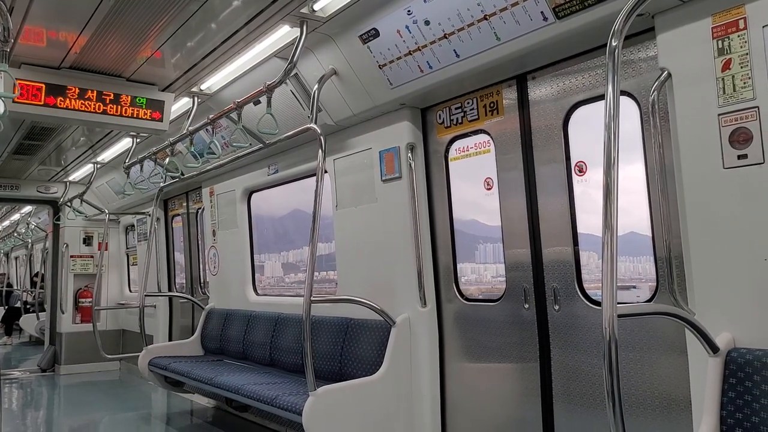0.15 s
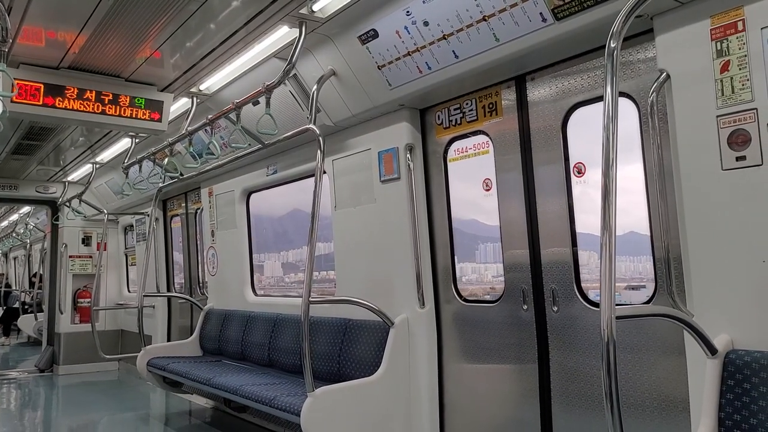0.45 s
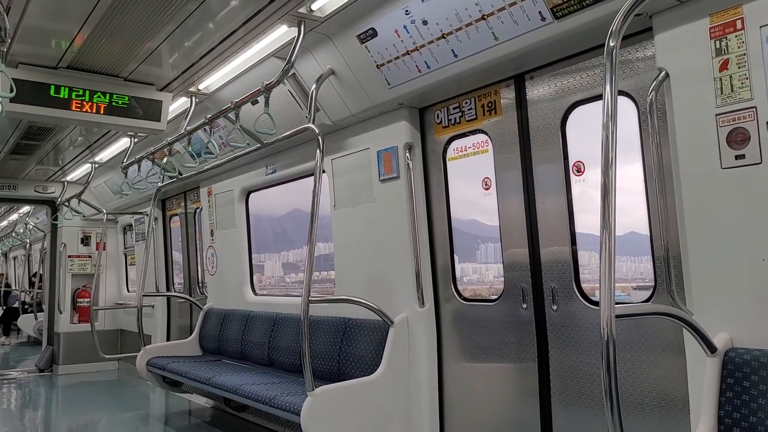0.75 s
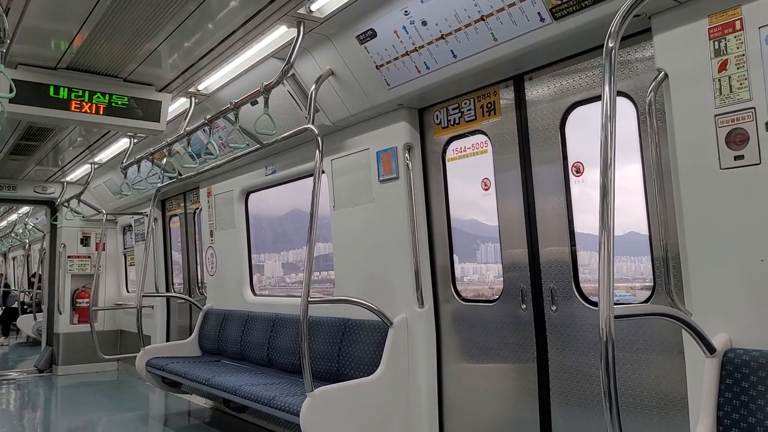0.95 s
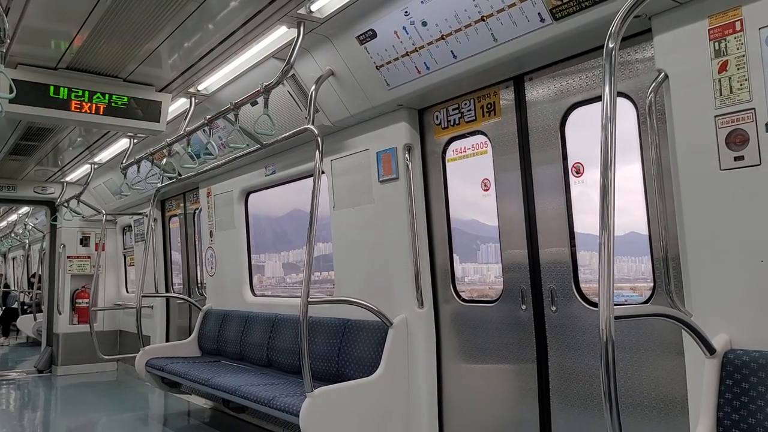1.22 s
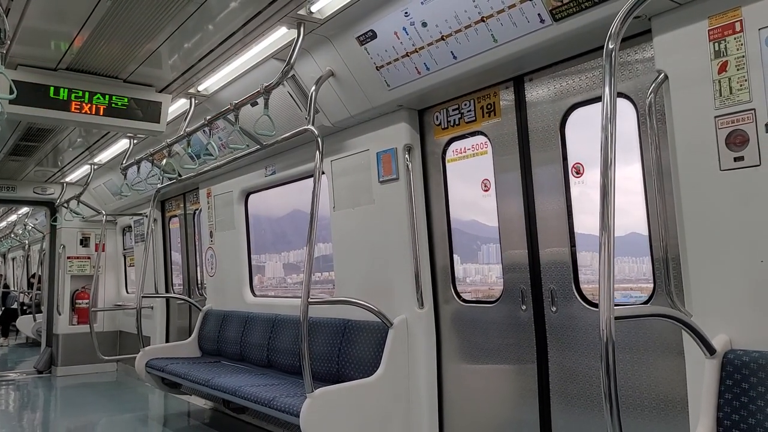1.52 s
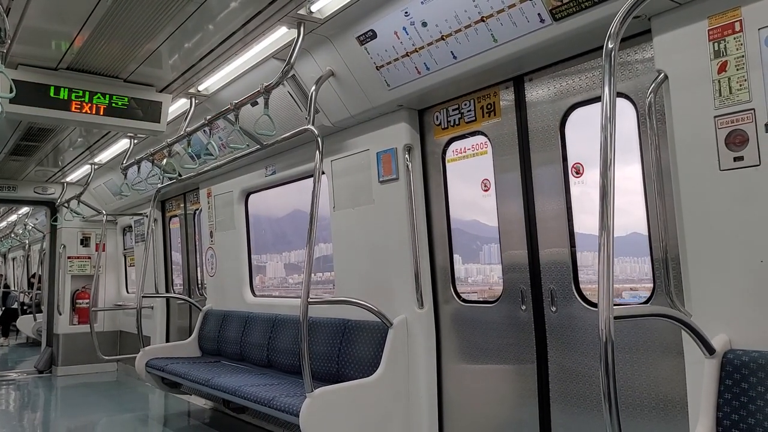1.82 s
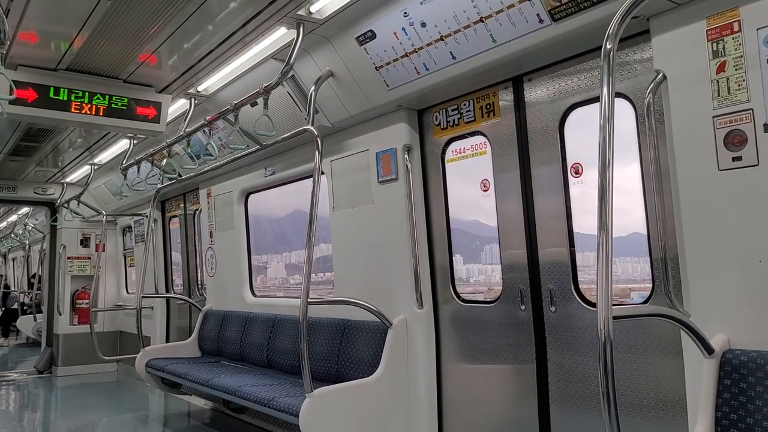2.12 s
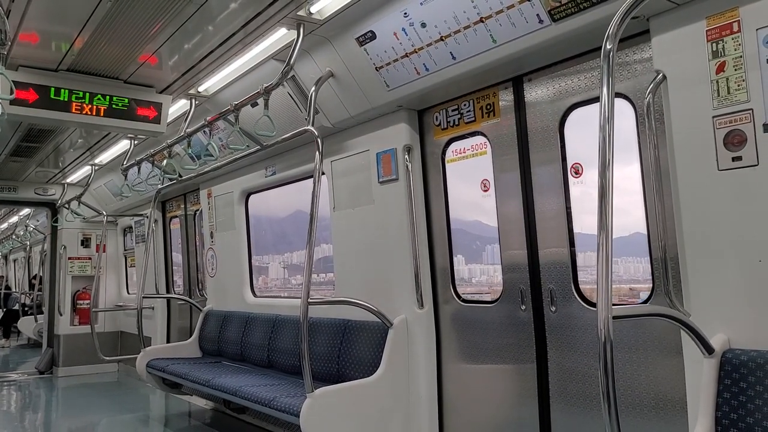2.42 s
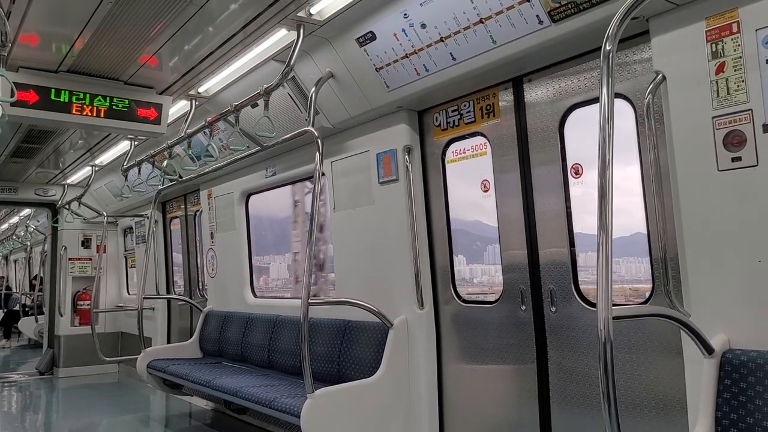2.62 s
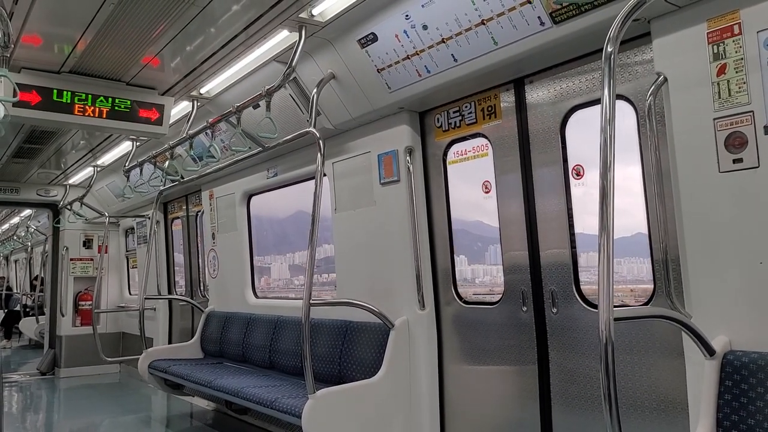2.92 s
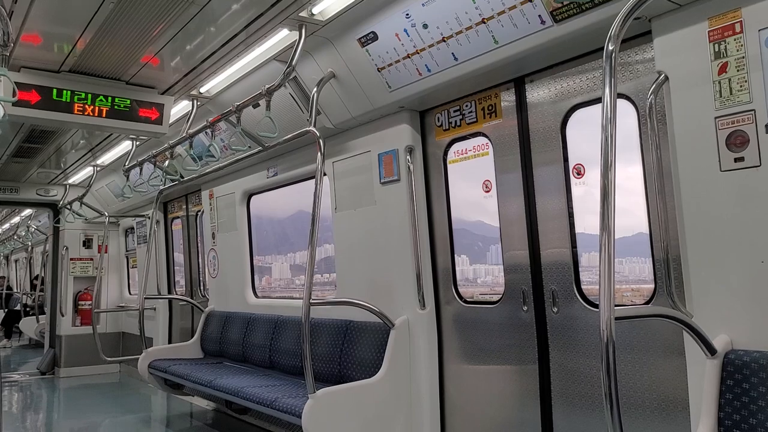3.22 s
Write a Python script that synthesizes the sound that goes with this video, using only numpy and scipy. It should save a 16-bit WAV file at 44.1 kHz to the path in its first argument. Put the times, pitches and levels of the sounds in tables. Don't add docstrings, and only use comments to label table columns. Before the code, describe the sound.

Metro train rumbles steadily inside an empty car: broad boomy wheel roar, irregular low thumps, dull axle knocks and light panel rattles, over ventilation air and faint electrical hum, picked up by a stereo microphone inside.

```python
import sys
import numpy as np
from scipy import signal
from scipy.fft import rfft, irfft, next_fast_len
from scipy.io import wavfile
from scipy.ndimage import uniform_filter1d

SR = 44100
rng = np.random.default_rng(int(sys.argv[2]) if len(sys.argv) > 2 else 0)


def volts_from_decibels(level):
    exponent = np.asarray(level, float) / 20
    return 10 ** exponent


def wav_out(sig):
    wavfile.write(sys.argv[1], SR, np.round(np.clip(np.atleast_2d(sig).T, -1, 1) * 32767).astype(np.int16))


N = 147735
LENGTH = next_fast_len(N)
HZ = np.maximum(np.arange(LENGTH // 2 + 1) * SR / LENGTH, 1)
TIME = np.arange(N) / SR


def curve(table, hz):
    table = np.array(table, float)
    return np.interp(np.log(hz), np.log(table[:, 0]), table[:, 1])


def band(lo_hz, hi_hz):
    return 1 / np.sqrt((1 + (lo_hz / HZ) ** 6) * (1 + (HZ / hi_hz) ** 12))


def resonances(modes):
    power = 0
    for hz, width_hz, db in modes:
        detune = (HZ / hz - hz / HZ) * hz / width_hz
        power = power + volts_from_decibels(db) ** 2 / (1 + detune ** 2) ** 2
    return np.sqrt(power) * band(15, 6500)


def walk(rate_hz):
    hold = int(SR / rate_hz)
    steps = np.repeat(rng.standard_normal(N // hold + 1), hold)
    return 1.3 * uniform_filter1d(uniform_filter1d(steps, hold), hold)[:N]


def swell(start_s, length_s):
    age = np.maximum(TIME - start_s, 0)
    return (1 - np.exp(-age / 0.0099)) / (1 + (age / length_s) ** 4)


def ports_apart(db):
    return volts_from_decibels(np.array([[db], [-db]]))


def diffuse_noise(gain, flicker_db, rate_hz, octaves):
    # (frequency [Hz], likeness [-1..1])
    port_likeness = [(40, .995), (120, 0.95), (190, 0.84), (330, 0.68), (460, -0.27), (700, -0.12),
                     (1000, -0.48), (1550, -0.53), (2200, 0.15), (2900, -0.24), (3800, -0.066)]
    # (frequency [Hz], left minus right [dB])
    port_tilt = [(40, 0.5), (130, 4.5), (240, -0.6), (370, 5), (600, 1), (1900, 1), (2300, 4), (3900, 6.5),
                 (5000, 3), (7500, 3.5), (9300, -6.5), (11500, -3), (15500, -2)]
    like = np.clip(curve(port_likeness, HZ), -.998, .998)
    noise = rfft(rng.standard_normal((2, LENGTH)))
    mid, side = noise * gain * np.sqrt([1 + like, 1 - like])
    ports = np.array([mid + side, mid - side])
    ports = ports * volts_from_decibels(np.outer([.5, -.5], curve(port_tilt, HZ)))
    place = np.clip(np.log2(HZ), octaves[0], octaves[-1])
    out = 0
    for centre in octaves:
        share = np.maximum(1 - np.abs(place - centre), 0)
        out = out + irfft(ports * share, LENGTH)[:, :N] * volts_from_decibels(flicker_db * walk(rate_hz))
    return out / np.sqrt(np.mean(out ** 2))


def blows(hits, rise_cycles, fall_cycles, trim_db, sag):
    out = np.zeros(N)
    for (felt_s, db, hz), turn in zip(hits, rng.random(len(hits))):
        start_s = felt_s - 0.00894
        span = slice(int(start_s * SR), int((start_s + 9 * fall_cycles / hz) * SR))
        cycles = (TIME[span] - start_s) * hz
        shape = (1 - np.exp(-(cycles / rise_cycles) ** 2)) * np.exp(-cycles / fall_cycles)
        phase = cycles * (1 + sag * np.exp(-cycles / 2)) + turn
        out[span] += volts_from_decibels(db + trim_db) * shape / shape.max() * np.sin(2 * np.pi * phase)
    return out * ports_apart(1.2)


def rail_roughness():
    # (time [s], roughness level [dB])
    rail = np.array([(0, -29), (.1, -29), (.22, -29), (.36, -26.5), (.47, -28.5), (.6, -31.5), (.78, -32),
                     (.85, -30), (1.3, -29.5), (1.42, -31), (1.68, -33), (1.8, -30), (2.08, -30.5),
                     (2.2, -29), (2.64, -32), (2.72, -30), (3.18, -28), (3.35, -30)], float)
    rough_db = np.interp(TIME, rail[:, 0], rail[:, 1])
    return rough_db - rough_db.mean()


def mains_hum():
    mains_hz = 119.94
    # (multiple of mains_hz [1], rms in step [dB], rms opposed [dB])
    partials = [(7, -62.0, -60.0), (8, -61.0, -64.0), (9, -65.0, -52.0), (10, -63.0, -58.0),
                (13, -66.0, -62.0), (14, -58.0, -56.0), (15, -64.0, -71.0), (16, -61.0, -62.0),
                (23, -72.0, -77.0), (27, -81.0, -83.0), (29, -78.0, -84.0), (30, -77.0, -79.0),
                (31, -74.0, -79.0)]
    out = 0
    for order, mid_db, side_db in partials:
        turn = rng.random((2, 1))
        level_db = np.array([[mid_db], [side_db]]) + 2.2 * walk(4.44)
        mid, side = np.sin(2 * np.pi * (order * mains_hz * TIME + turn)) * volts_from_decibels(level_db)
        out = out + np.sqrt(2) * np.array([mid + side, mid - side])
    return out


def ventilation(rough_db):
    # (frequency [Hz], density [dB per Hz])
    air_spectrum = [(900, -16.5), (1200, -22.5), (1600, -20.5), (2250, -23.5), (2550, -33.5), (3500, -33),
                    (4000, -34), (4550, -31.5)]
    gain = volts_from_decibels(curve(air_spectrum, HZ)) * band(710, 4270) ** 2
    return volts_from_decibels(-42 + 0.061 * rough_db) * diffuse_noise(gain, 0.93, 6.1, octaves=[10, 11, 12])


def hiss(rough_db):
    # (frequency [Hz], density [dB per Hz])
    hiss_spectrum = [(3000, -7), (5200, 5.5), (7000, 1.5), (8800, -1.5), (9900, -1), (12000, 0), (15500, 1)]
    gain = volts_from_decibels(curve(hiss_spectrum, HZ)) * band(2100, 18100)
    level_db = -58.5 + 0.17 * rough_db + 1.2 * walk(6.5)
    return volts_from_decibels(level_db) * diffuse_noise(gain, 0.26, 6.9, octaves=[12, 13, 14])


def creaks():
    # (time [s], level [dB], pitch [Hz], width [Hz], length [s])
    creak_events = [(0, -63, 11000, 8000, .03), (.1, -67, 10500, 5000, .33), (.14, -39, 220, 40, .15),
                    (.33, -38, 1100, 1000, .05), (.33, -65, 5950, 900, .09), (.6, -51, 2200, 900, .2),
                    (.71, -65, 7000, 900, .04), (1.167, -47, 750, 395, .03), (1.7, -41, 190, 50, .14),
                    (1.775, -46, 1130, 200, .05), (1.86, -55, 2690, 90, .05), (2.18, -61, 3720, 30, .2),
                    (2.3, -43, 200, 50, .12), (2.74, -62, 3720, 30, .12), (2.87, -56, 2880, 40, .08),
                    (2.88, -42, 225, 40, .07), (3.04, -52, 2880, 80, .05), (3.05, -47, 1080, 70, .06),
                    (3.06, -46, 2250, 300, .05), (3.12, -57, 3720, 30, .1), (3.13, -37, 560, 160, .15),
                    (3.14, -54, 2910, 30, .12), (3.16, -54, 2430, 80, .06), (3.335, -62, 11000, 8000, .03)]
    noise = rfft(rng.standard_normal((2, LENGTH)))
    out = 0
    for start_s, db, hz, width_hz, length_s in creak_events:
        detune = (HZ / hz - hz / HZ) * hz / width_hz
        ring = irfft(noise / (1 + detune ** 2), LENGTH)[:, :N]
        out = out + volts_from_decibels(db) * swell(start_s, length_s) * ring / ring.std()
    return out


def panel_rattles():
    # (time [s], peak [dB], pitch [Hz])
    rattle_hits = [(0.103, -25, 738), (0.191, -25, 690), (0.274, -29, 732), (0.332, -23, 724),
                   (0.456, -22, 660), (0.846, -22.5, 491), (1.174, -26, 683), (1.208, -25, 520),
                   (1.278, -22, 670), (1.333, -23, 610), (1.41, -32, 720), (1.449, -28, 680),
                   (1.72, -35, 680), (1.788, -26, 727), (1.875, -25, 665), (2.001, -23.5, 497),
                   (2.141, -23, 473), (2.206, -25, 673), (2.804, -30, 715), (2.856, -28, 675),
                   (2.914, -20, 653), (3.038, -28, 687), (3.139, -19.5, 678), (3.206, -22.5, 627)]
    return blows(rattle_hits, rise_cycles=2.8, fall_cycles=8.4, trim_db=-6, sag=.01)


def floor_rings():
    # (time [s], level [dB], length [s])
    shakes = [
        (.1, -43, .27),
        (.31, -38, .086),
        (.464, -37, .09),
        (1.075, -40, .14),
        (1.2, -33, .17),
        (1.6, -37, .08),
        (1.66, -33, .18),
        (2.14, -34, .17),
        (2.684, -33, .22),
        (3.14, -35, .12),
    ]
    # (frequency [Hz], width [Hz], level [dB])
    panel_modes = [(342.6, 38, -10), (376, 39, -13), (670, 63, -14.5)]
    sing_hz = 346 * (1 + .014 * walk(25))
    sing = np.sin(2 * np.pi * np.cumsum(sing_hz) / SR) * volts_from_decibels(1.3 * walk(20)) * ports_apart(2.5)
    shaking = volts_from_decibels(-2.5) * diffuse_noise(resonances(panel_modes), 0.32, 14, octaves=[9])
    envelope = sum(volts_from_decibels(db) * swell(start_s, length_s) for start_s, db, length_s in shakes)
    return envelope * (shaking + sing)


def axle_knocks():
    # (time [s], peak [dB], pitch [Hz])
    knock_hits = [(0.121, -13, 280), (0.189, -21.5, 381), (0.367, -17.5, 348), (0.479, -14, 341),
                  (1.281, -15, 368), (1.687, -26, 335), (1.772, -19, 382), (2.156, -17.5, 403),
                  (2.226, -27, 344), (2.699, -16, 377), (2.834, -18, 355), (3.149, -16, 300),
                  (3.191, -12, 353), (3.244, -13.5, 310)]
    return blows(knock_hits, rise_cycles=2.15, fall_cycles=4.5, trim_db=-9, sag=0.015)


def track_thumps():
    # (time [s], peak [dB], pitch [Hz])
    thump_hits = [(.04, -13.5, 50.3), (.134, -11, 95), (.158, -10.5, 67), (.245, -12, 63),
                  (.295, -12.5, 52), (.328, -15.5, 51.4), (.385, -18, 85), (.44, -14, 72),
                  (.478, -11, 43.8), (.51, -12.5, 42), (.635, -19, 44), (.725, -17, 80), (.785, -17, 77),
                  (.855, -21.5, 68.6), (.92, -20, 45), (.985, -23, 56), (1.038, -18, 56), (1.115, -21, 46),
                  (1.185, -14, 70), (1.255, -15, 63), (1.305, -16, 80), (1.38, -13, 93), (1.497, -24, 52),
                  (1.565, -21, 55), (1.885, -12.5, 43), (1.96, -16, 52.4), (1.99, -16, 96), (2.01, -16, 44),
                  (2.21, -15.5, 49), (2.255, -16, 67), (2.325, -18, 41.6), (2.365, -18, 58.4),
                  (2.41, -20, 44.4), (2.445, -17.5, 58), (2.51, -19.5, 59), (2.58, -20, 60),
                  (2.71, -17, 71), (2.83, -19, 95), (2.875, -21, 68), (2.945, -21, 68), (3.01, -23, 92),
                  (3.03, -23, 50), (3.115, -24, 54.6), (3.225, -18.5, 54), (3.255, -17, 43.2)]
    return blows(thump_hits, rise_cycles=1.2, fall_cycles=1.5, trim_db=-6.5, sag=.22)


def shell_drones(rough_db):
    # (frequency [Hz], rms [dB], share of pitch wander [1])
    drone_tones = [
        (46.85, -37.5, 0.0877),
        (72.2, -42, 0.1036),
    ]
    out = 0
    for hz, db, wander in drone_tones:
        phase = 2 * np.pi * np.cumsum(hz * (1 + wander * walk(16))) / SR
        out = out + volts_from_decibels(db + 2.2 * walk(4.7)) * np.sin(phase)
    return volts_from_decibels(0.25 * rough_db) * np.sqrt(2) * out * ports_apart(.8)


def body_shell(rough_db):
    # (frequency [Hz], width [Hz], level [dB])
    shell_modes = [(47.2, 9.1, -4.5), (72, 30, -9.5), (96.7, 32.5, -10), (32, 20, -11), (222, 24, -15)]
    boom = diffuse_noise(resonances(shell_modes), 0.9, 3.23, octaves=[6, 7])
    return volts_from_decibels(-32 + rough_db) * boom


def wheel_modes(rough_db):
    # (frequency [Hz], width [Hz], level [dB])
    wheel_resonances = [(355.4, 92, -6.5), (713, 70, -8.5), (782, 170, -9.5), (503, 45, -8),
                        (1080, 32, -16), (1533, 240, -15), (2682, 70, -27), (2916, 64, -22.5),
                        (3700, 87, -32.5), (4420, 410, -40.5)]
    ringing = diffuse_noise(resonances(wheel_resonances), 1.0, 7.84, octaves=[9.53, 10.18, 11.21, 12.09])
    return volts_from_decibels(-34 + 1.35 * rough_db) * ringing


def rolling_roar(rough_db):
    # (frequency [Hz], density [dB per Hz])
    roar_spectrum = [(65, -62), (110, -9.5), (162, -14), (343, -9.5), (427, -9.5), (729, -9), (1270, -20.5),
                     (2160, -26), (6000, -59), (7800, -81), (13200, -120)]
    gain = volts_from_decibels(curve(roar_spectrum, HZ)) * band(105, 3700)
    roar = diffuse_noise(gain, 0.91, 11, octaves=[6.805, 7.66, 8.724, 9.948, 11.02])
    return volts_from_decibels(-30 + 1.74 * rough_db) * roar


def scene():
    rough_db = rail_roughness()
    background = mains_hum() + ventilation(rough_db) + hiss(rough_db)
    fittings = creaks() + panel_rattles() + floor_rings()
    track = axle_knocks() + track_thumps() + shell_drones(rough_db)
    rolling = body_shell(rough_db) + wheel_modes(rough_db) + rolling_roar(rough_db)
    return background + fittings + track + rolling


def low_pass(x):
    return signal.sosfilt(signal.butter(12, 15920, fs=SR, output="sos"), x)


def record(dry):
    opened = dry * np.minimum(TIME / .004 + .3, 1)
    mix = irfft(rfft(opened, LENGTH) * (HZ < 15790), LENGTH)[:, :N]
    return low_pass(mix)


dry = scene()
out = record(dry)
wav_out(out)
```